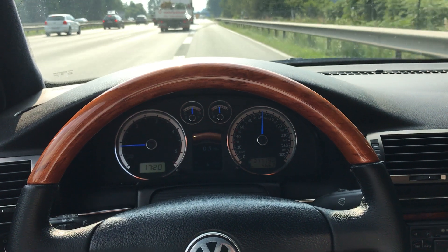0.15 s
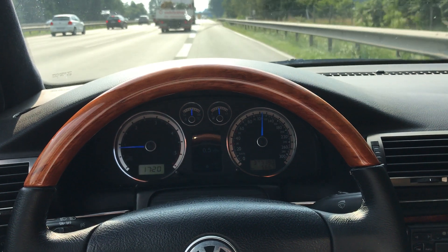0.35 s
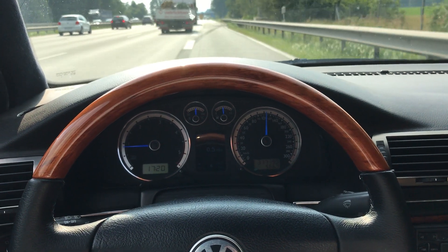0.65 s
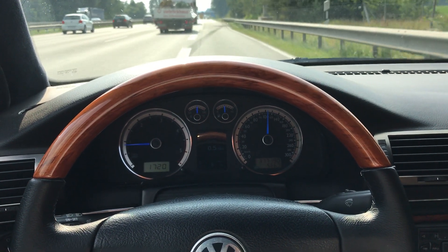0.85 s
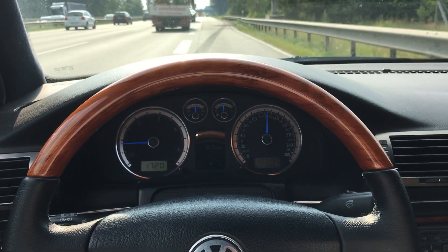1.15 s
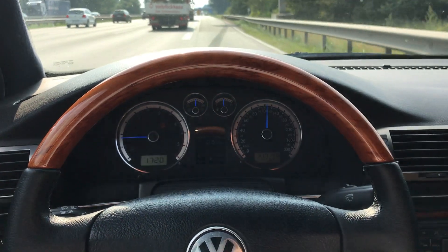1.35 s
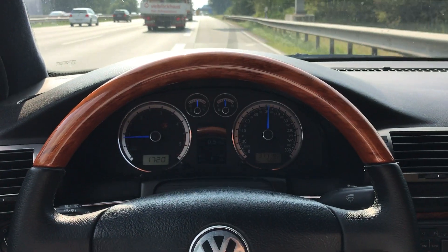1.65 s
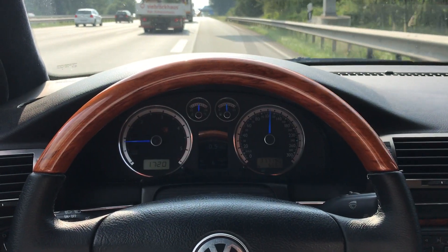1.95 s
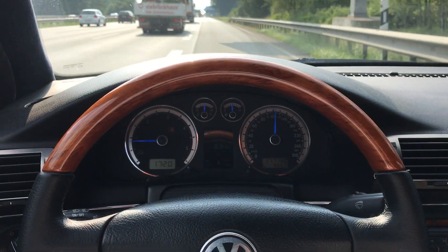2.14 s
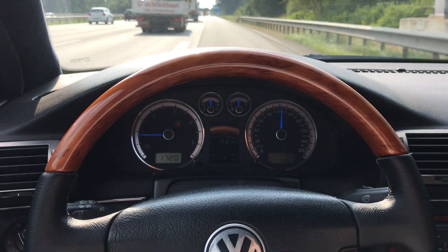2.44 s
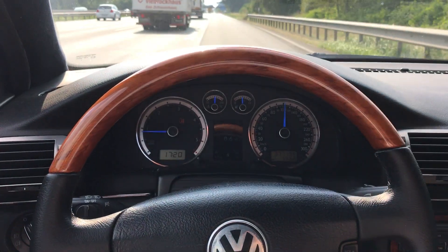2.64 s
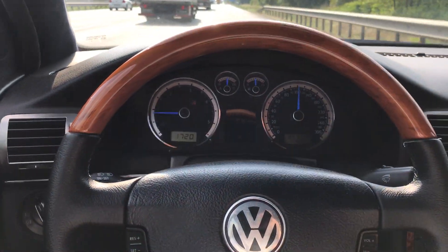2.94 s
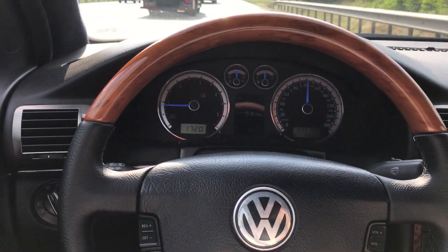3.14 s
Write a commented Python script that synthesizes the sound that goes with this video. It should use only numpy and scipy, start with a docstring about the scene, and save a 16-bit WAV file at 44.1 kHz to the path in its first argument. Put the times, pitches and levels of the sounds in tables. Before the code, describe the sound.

Steady low rumble of road, wind and engine inside a car at highway speed

```python
"""Inside a car at steady highway speed. Gusts buffet the body and hiss along the windows: shaped noise
under timed levels. The cabin booms at its lowest resonance, near 48 Hz. The tyres roar near 1 kHz as noise
with resonances, flaring early on over patches of road, and their tread hums with a wavering pitch.
Bumps thump through the suspension as quickly dying sines; the trim gives a few faint noise ticks."""
import sys
import numpy as np
from scipy import signal
from scipy.fft import rfft, irfft
from scipy.io import wavfile
from scipy.ndimage import uniform_filter1d

SR = 44100
rng = np.random.default_rng(int(sys.argv[2]) if len(sys.argv) > 2 else 0)


def master(y):
    """Save y as 16-bit WAV."""
    cut = np.clip(np.atleast_2d(y).T, -1, 1)
    pcm = np.round(cut * 32767)  # scale
    wavfile.write(sys.argv[1], SR, pcm.astype(np.int16))


N = 145089


def undb(db):
    """Decibels to amplitude gain."""
    return 10 ** (np.asarray(db) / 20)


def curve(table):
    """Second column of a timed table, joined by straight lines."""
    rows = np.array(table)
    return np.interp(np.arange(N) / SR, rows[:, 0], rows[:, 1])


def bell(hz, centre_hz, width_hz):
    """Resonance curve: 1 at the centre, one half at half a width to either side."""
    return 1 / (1 + (2 * (hz - centre_hz) / width_hz) ** 2)


def noise(colour=None, peaks=(), band=None):
    """Unit-RMS noise, coloured by a spectrum, lifted by resonances or confined to a band (Hz, width Hz)."""
    hz = np.maximum(np.fft.rfftfreq(N, 1 / SR), 1)
    gain = np.ones(len(hz)) if band is None else bell(hz, *band)
    if colour is not None:
        rows = np.array(colour)
        level_db = np.interp(np.log(hz), np.log(rows[:, 0]), rows[:, 1])
        top_hz = rows[-1, 0]
        gain = gain * undb(level_db)
        gain = gain * np.minimum(top_hz / hz, 1) ** 4  # 24 dB/octave above the table
    for centre_hz, width_hz, lift_db in peaks:
        gain = gain * undb(lift_db * bell(hz, centre_hz, width_hz))
    x = irfft(rfft(rng.standard_normal(N)) * gain, N)
    return x / x.std()


def wander(rate_per_s):
    """Unit random drift that turns about rate_per_s times a second: Gaussian low-passed noise."""
    hz = np.fft.rfftfreq(N, 1 / SR)
    x = irfft(rfft(rng.standard_normal(N)) * np.exp(-(2 * hz / rate_per_s) ** 2), N)
    return x / x.std()


def flutter(rate_per_s, rms_db):
    """Gain that wanders at random."""
    return undb(rms_db * wander(rate_per_s))


def even(x, span_s):
    """Noise divided by its running RMS, so that slow chance swells vanish."""
    size = max(int(span_s * SR), 2)
    power = uniform_filter1d(uniform_filter1d(x ** 2, size), size)
    return x / np.sqrt(power)


def reflect(x):
    """Close, quickly fading reflections off glass and dashboard ripple the spectrum."""
    echo_db, decay_s = -11, 0.0054  # all echoes together; time to 1/e
    t = np.arange(N) / SR
    echoes = rng.standard_normal(N) * np.exp(-t / decay_s) * (t > decay_s / 2)
    echoes *= undb(echo_db) / np.linalg.norm(echoes)
    return irfft(rfft(x) * (1 + rfft(echoes)), N) / np.hypot(1, undb(echo_db))


def buffeting():
    """Turbulent gusts shake the body panels: low rumble with a fluttering level."""
    # gust rumble before offset: t/s, level/dB
    gust_levels = [(0.1, -23.5), (0.21, -20.5), (0.31, -22.5), (0.34, -19), (0.47, -24.5), (0.52, -20),
                   (0.555, -27), (0.6, -21), (0.66, -20), (0.705, -26.5), (0.745, -19.5), (0.84, -24.5),
                   (1.02, -26), (1.055, -19), (1.13, -21), (1.2, -16.5), (1.29, -22.5), (1.34, -29),
                   (1.41, -29.5), (1.5, -24), (1.65, -19), (1.71, -22.5), (1.8, -20), (1.92, -25.5),
                   (1.98, -28.5), (2.09, -22), (2.14, -25), (2.27, -22), (2.31, -19), (2.48, -31),
                   (2.53, -23.5), (2.59, -30.5), (2.65, -29.5), (2.75, -17.5), (2.87, -21), (2.95, -27.5),
                   (3.06, -31), (3.15, -20.5), (3.2, -22.5), (3.25, -18), (3.28, -22)]
    # relative rumble spectrum: f/Hz, level/dB
    rumble_colour = [(15, -50), (40, -19.5), (66, -1.5), (105, -1), (135, 0.5), (162, -7), (188, -3.5),
                     (235, -12.5), (290, -23), (335, -17), (390, -29), (500, -34), (1200, -38)]
    offset_db = 0.74
    rumble = even(noise(rumble_colour), span_s=0.042) * flutter(rate_per_s=29, rms_db=0.92)
    return rumble * undb(curve(gust_levels) + offset_db)


def window_hiss():
    """Turbulent air hisses along the windows: reflected high noise with a fluttering level."""
    # window hiss before offset: t/s, level/dB
    hiss_levels = [(0.1, -51), (0.25, -48.5), (0.42, -51.5), (0.76, -49), (0.83, -52.5), (1.08, -53),
                   (1.2, -47.5), (1.26, -50.5), (1.35, -56), (1.45, -51.5), (1.48, -53.5), (1.81, -50),
                   (1.85, -54), (2.22, -52), (2.28, -50.5), (2.42, -55), (2.45, -51), (2.48, -54),
                   (2.68, -55.5), (2.75, -50.5), (2.8, -50), (2.83, -48.5), (2.885, -50.5), (2.91, -55.5),
                   (3.0, -54.5), (3.1, -53), (3.28, -51.5)]
    # relative hiss spectrum: f/Hz, level/dB
    hiss_colour = [(600, -2), (2000, 5), (3300, 2.5), (4500, -2.5), (4950, -4.5), (5800, -4.5),
                   (6800, -6.5), (7500, -10), (8400, -9.5), (9600, -11), (10400, -16.5), (11400, -13),
                   (13500, -15.5), (15800, -19)]
    offset_db = 6
    hiss = reflect(noise(hiss_colour)) * flutter(rate_per_s=74, rms_db=0.92)
    return hiss * undb(curve(hiss_levels) + offset_db)


def cabin():
    """Road and engine drive the lowest resonance of the cabin air in slow swells."""
    # cabin boom before offset: t/s, level/dB
    boom_levels = [(.1, -23), (.2, -30), (.28, -15.5), (.4, -26.5), (.6, -28), (.72, -60), (.82, -24),
                   (1.0, -34), (1.08, -24), (1.28, -26), (1.42, -30.5), (1.52, -29), (1.61, -22),
                   (1.72, -29), (1.84, -19.5), (2.05, -29.5), (2.2, -24), (2.42, -18.5), (2.5, -28),
                   (2.72, -29), (2.84, -24.5), (3.0, -27), (3.18, -25), (3.28, -34)]
    # relative boom spectrum: f/Hz, level/dB
    boom_colour = [(10, -36), (22, -27), (29, 1), (37, -10), (43, -5.5), (48, 7), (54, 0.5), (62, -4),
                   (75, -17), (120, -47)]
    offset_db = 0.5
    return even(noise(boom_colour), span_s=0.31) * undb(curve(boom_levels) + offset_db)


def road_patches():
    """Patches of the road make brief Gaussian flares of narrow-band tyre noise."""
    # flares before offset, relative to the roar: t/s, gain/dB
    flare_gains = [(0.121, 7.5), (0.261, 4), (0.279, 4), (0.555, 9.5), (.63, 1.5), (0.706, 5), (0.851, 2),
                   (.997, 5), (1.094, 4.5), (1.223, 1.5)]
    sigma_s, centre_hz, width_hz, offset_db = 0.007, 1100, 290, -3
    t = np.arange(N) / SR
    envelope = sum(undb(db) * np.exp(-.5 * ((t - at_s) / sigma_s) ** 2) for at_s, db in flare_gains)
    return envelope * undb(offset_db) * even(noise(band=(centre_hz, width_hz)), span_s=0.0087)


def tyres():
    """Rolling noise with narrow tread and cavity resonances, road-patch flares and uneven grit."""
    # tyre noise before offset: t/s, level/dB
    roar_levels = [(.1, -30), (.6, -32), (1.1, -32.5), (1.7, -33.5), (2.4, -34), (3.05, -34.5), (3.28, -33)]
    # relative roar spectrum: f/Hz, level/dB
    roar_colour = [(150, -1), (255, 3.5), (380, -4.5), (470, -5), (510, -7.5), (570, 0.5), (615, -9.5),
                   (680, -2), (800, -2), (1000, 3.5), (1120, 1), (1300, -2), (1550, -3.5), (1680, -8.5),
                   (1900, -3), (2150, -12.5), (2550, -15), (3000, -23), (4300, -25), (7000, -52)]
    # tread and cavity resonances: f/Hz, width/Hz, lift/dB
    tyre_peaks = [(424, 20, 5.5), (810, 43, 5.5), (1340, 35, -0.5), (1540, 44, 2), (1990, 60, 0.5)]
    offset_db = 0.96
    grit_hz, grit_width_hz, grit_db = 2524, 560, -20.5  # level relative to the roar
    roar = reflect(noise(roar_colour, tyre_peaks)) * flutter(rate_per_s=81, rms_db=0.83)
    patches = road_patches()
    grit = undb(grit_db) * noise(band=(grit_hz, grit_width_hz)) * flutter(rate_per_s=73, rms_db=2.5)
    return (roar + patches + grit) * undb(curve(roar_levels) + offset_db)


def tread():
    """The tread blocks hum; the pitch wavers and the hum comes and goes with the road surface."""
    # tread hum: t/s, level/dB
    tread_levels = [(.1, -54), (.45, -49), (.62, -47), (.85, -55), (1.1, -39), (1.3, -46), (1.56, -36),
                    (1.7, -48), (2.2, -45.5), (2.6, -48), (2.89, -38), (3.0, -49), (3.2, -36)]
    centre_hz, width_hz, waver_rms_hz, waver_per_s = 960, 26, 14, 14
    hum = signal.hilbert(even(noise(band=(centre_hz, width_hz)), span_s=0.033))
    drift_rad = 2 * np.pi * np.cumsum(waver_rms_hz * wander(waver_per_s)) / SR
    wavering_hum = (hum * np.exp(1j * drift_rad)).real
    return wavering_hum * undb(curve(tread_levels))


def suspension():
    """A bump shakes the body for a few quickly dying cycles."""
    # bump thumps: t/s, envelope peak/dB, nominal f/Hz
    bumps = [(0.575, -11.5, 78.6), (1.197, -7, 86), (2.296, -15, 73), (2.56, -12.5, 95), (2.749, -9.5, 86),
             (2.785, -14, 80.5)]
    rise_s, pitch_spread = 0.006, 0.07  # spread: RMS fraction of pitch
    out = np.zeros(N)
    for (at_s, db, nominal_hz), chance in zip(bumps, rng.standard_normal(len(bumps))):
        age_s = np.maximum(np.arange(N) / SR - at_s, 0)
        envelope = age_s / rise_s * np.exp(1 - age_s / rise_s)
        hz = nominal_hz * (1 + pitch_spread * chance)
        out += undb(db) * envelope * np.sin(2 * np.pi * hz * age_s)
    return out


def trim():
    """Plastic parts tick: a short wide-band crack with one high ring."""
    # trim ticks before envelope: t/s, ring level/dB, ring f/Hz
    ticks = [(1.088, -48, 6300), (1.131, -44.5, 6800), (1.333, -51, 12900), (1.417, -49, 12500),
             (2.4436, -41.5, 7200), (2.748, -47, 8160), (2.883, -60, 8800)]
    rise_s, decay_s = 0.00078, 0.0027
    ring_width_hz, crack_width_hz, crack_db = 270, 5500, 1.5  # crack relative to ring
    out = np.zeros(N)
    for at_s, db, ring_hz in ticks:
        age_s = np.maximum(np.arange(N) / SR - at_s, 0)
        envelope = (1 - np.exp(-age_s / rise_s)) * np.exp(-age_s / decay_s)
        ring = even(noise(band=(ring_hz, ring_width_hz)), span_s=0.0053)
        crack = noise(band=(ring_hz, crack_width_hz))
        out += undb(db) * envelope * (ring + undb(crack_db) * crack)
    return out


def scene():
    """Mono sum of all sources."""
    wind = buffeting() + window_hiss()
    return (wind + cabin() + tyres() + tread() + suspension() + trim())[None, :]


def record(dry):
    """The sound starts abruptly and a steep low-pass cuts the top."""
    start_s, top_hz = .0838, 15800
    running = np.arange(N) / SR >= start_s
    low_pass = signal.ellip(10, .1, 90, top_hz, fs=SR, output="sos")  # ripple, stopband in dB
    return signal.sosfilt(low_pass, dry * running)


dry = scene()
out = record(dry)
master(out)
```